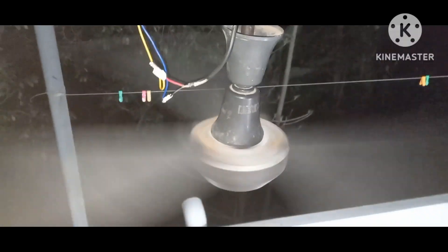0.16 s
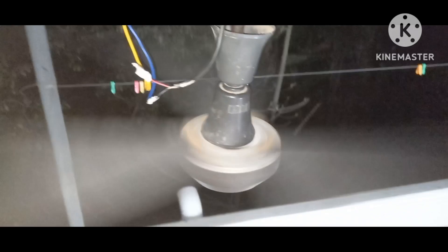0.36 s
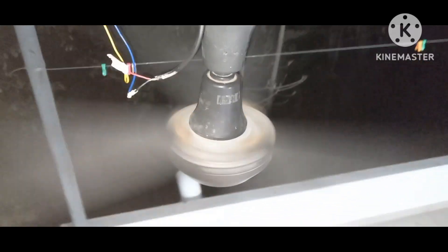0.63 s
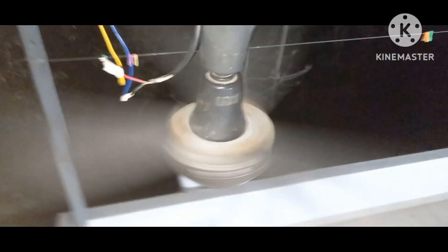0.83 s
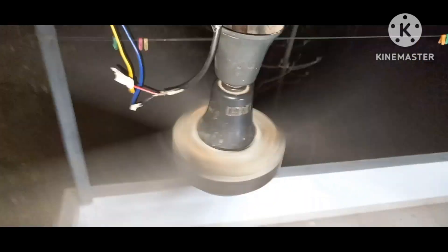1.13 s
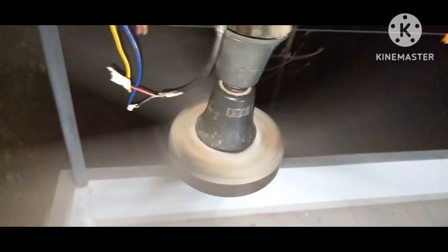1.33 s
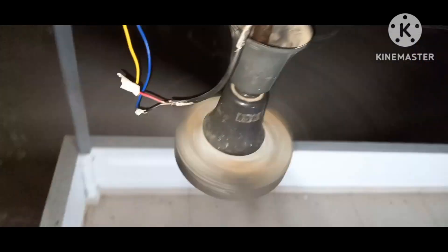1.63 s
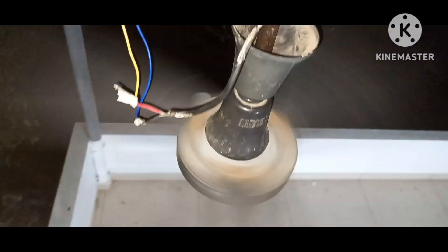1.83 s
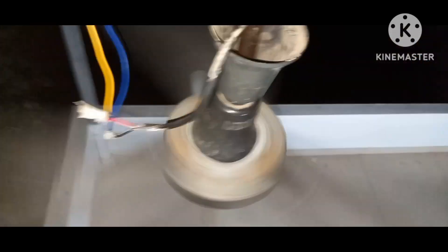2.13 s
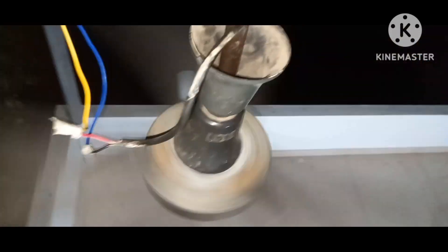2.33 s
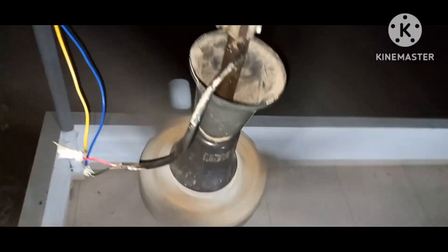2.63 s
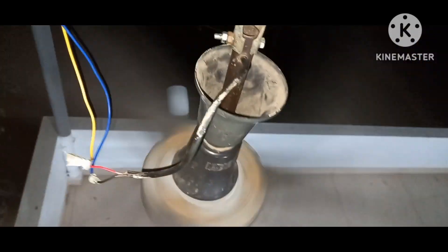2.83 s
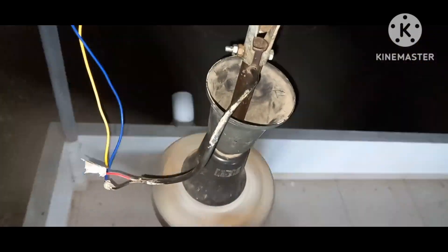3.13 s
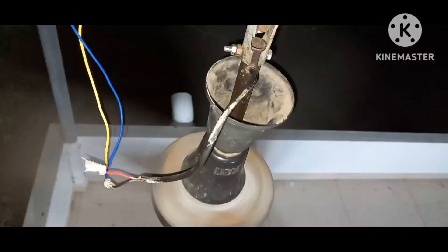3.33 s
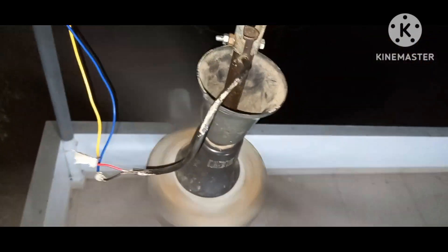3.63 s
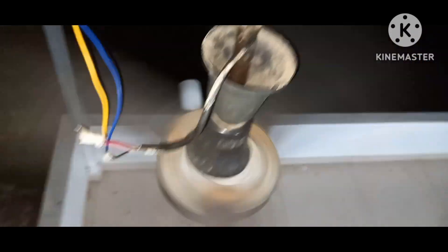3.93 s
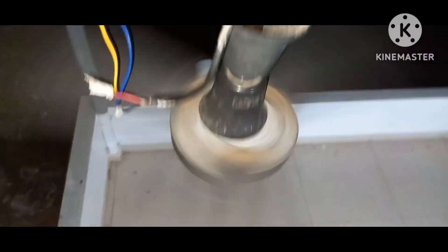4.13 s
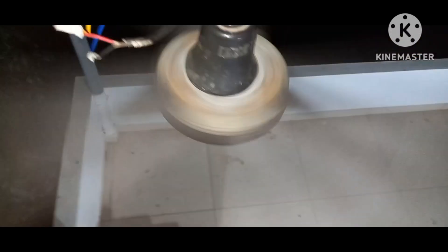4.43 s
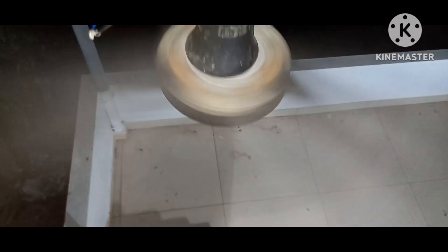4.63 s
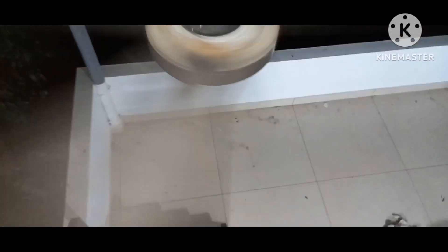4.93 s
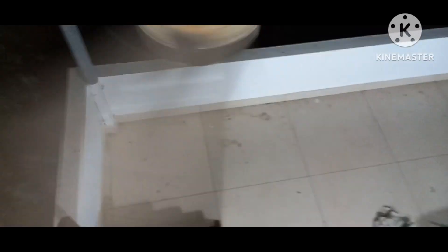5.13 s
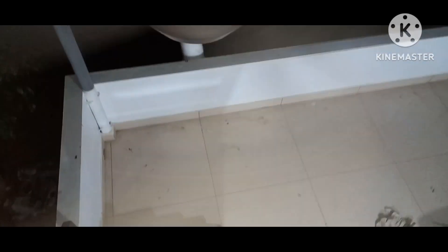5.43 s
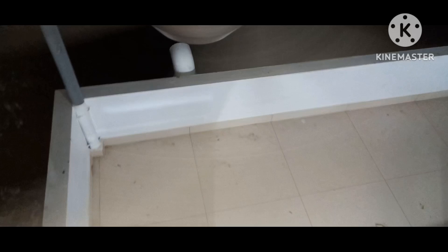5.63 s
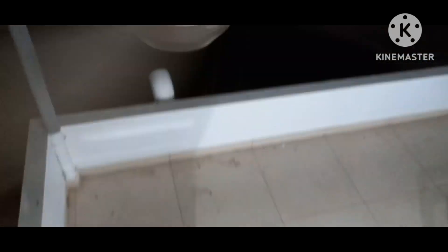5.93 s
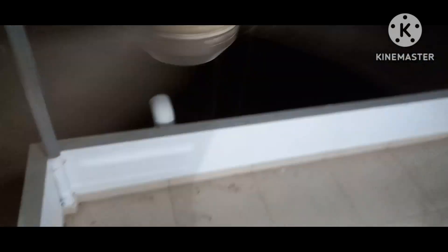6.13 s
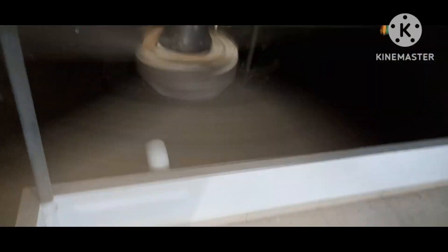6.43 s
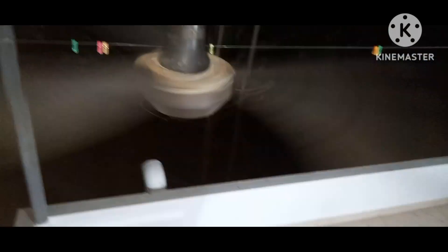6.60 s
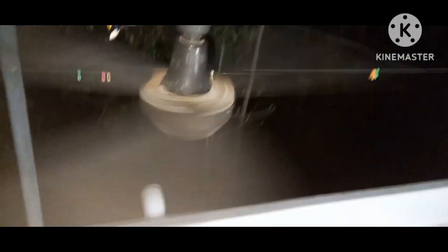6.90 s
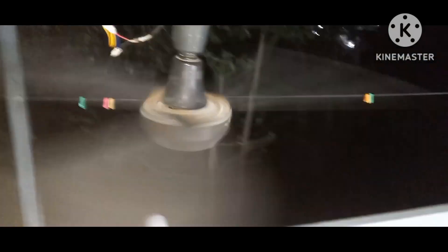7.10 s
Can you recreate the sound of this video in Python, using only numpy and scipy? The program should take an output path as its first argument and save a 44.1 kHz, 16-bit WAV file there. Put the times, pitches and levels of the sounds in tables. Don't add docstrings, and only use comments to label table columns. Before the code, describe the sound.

Close, breathy fan noise with rapid blade flutter fills an open roofed terrace at night. Uneven bassy gusts buffet the left and right of the microphone as it moves around the fan, with dull tip slaps scattered through. A slight hollow resonance and faint motor whine sit inside the rush. Behind it, high katydid scraping continues, with a few soft cricket pulses.

```python
import sys
import numpy as np
from scipy import signal
from scipy.fft import rfft, irfft, next_fast_len
from scipy.io import wavfile
from scipy.ndimage import uniform_filter1d, map_coordinates

SR = 44100
rng = np.random.default_rng(int(sys.argv[2]) if len(sys.argv) > 2 else 0)


def linear_from_db(decibels):
    return 10 ** (np.asarray(decibels, float) / 20)


def generate_wav(sig):
    pcm = np.round(np.clip(np.atleast_2d(sig).T, -1, 1) * 32767).astype(np.int16)
    wavfile.write(sys.argv[1], SR, pcm)


N = 320166
BLADE_HZ, BLADE_AT = 15.25, .37

# (time [s], depth [dB], lag [share of a pass])
BEAT = [(0, 2.5, 0.13), (.9, 2, 0.05), (1.5, 3, 0), (2.1, 3.5, 0.1), (2.7, -0.2, 0.05), (3.3, 2.5, 0.1),
        (3.9, 1, 0.13), (4.5, 3, 0), (5.1, 1.5, 0.04), (5.7, 3, -.12), (6.3, 3.5, 0), (7.26, 2, 0.1)]
# (time [s], recorder gain [dB], nearness [0-1], height over the blade plane [-1 to 1])
HAND = [(0.08, -5, 0.3, -0.34), (.47, -5.5, 0.22, -0.24), (.75, -5.5, 0.45, -0.26), (1.0, 1, 0.15, -0.079),
        (1.36, 2, 0.18, 0.27), (1.55, -1.5, 0.3, .5), (2.05, -1.5, 0.16, 0.58), (2.5, -1, 0.47, 0.12),
        (3.0, -1, 0.24, 0.87), (3.46, 1, 0.5, .8), (3.9, -1, 0.22, 0.8), (4.3, 1, 0.44, 0.26),
        (4.9, -0.5, 0.53, -0.05), (5.4, 1, 0.61, -0.48), (6.0, 4, 0.6, -0.3), (6.2, 2, 0.86, -0.72),
        (6.7, 1.5, 0.61, -0.65), (7.26, 1.5, 0.65, -1.1)]
# (frequency [Hz], left-right likeness [0-1])
ALIKE = [(60, 1), (250, 0.8), (500, 0.71), (900, 0.42), (1200, 0.095), (1500, 0.13), (3000, 0),
         (8000, 0.44)]


def unit(x):
    return x / np.sqrt(np.mean(x ** 2) + 1e-20)


def along(points, hz):
    f, v = np.transpose(points)
    return np.interp(np.log(hz + 1), np.log(f + 1), v)


def curves(rows):
    s, *cols = np.transpose(rows)
    return [np.interp(np.arange(N) / SR, s, c) for c in cols]


def wobble(rate):
    knots = rng.standard_normal(int(N * 80 / SR) + 4)
    return map_coordinates(knots, [np.arange(N) * min(rate, 79) / SR])


def filtered(x, response):
    m = next_fast_len(N + 8192)
    return irfft(rfft(x, m) * response(np.fft.rfftfreq(m, 1 / SR)), m)[..., :N]


def ring(f, hz, width):
    return 1j * f * width / (hz * hz - f * f + 1j * f * width)


def air(spectrum, alike, patchy_db):
    z = signal.stft(rng.standard_normal((2, N)), nperseg=512)[2]
    field = uniform_filter1d(rng.standard_normal(z.shape[1:]), size=4, axis=0)
    field = uniform_filter1d(field, size=4, axis=1)
    pair = signal.istft(z * linear_from_db(patchy_db * unit(field)), nperseg=512)[1][:, :N]

    def mid_side(hz):
        turn = np.arccos(np.clip(along(alike, hz), -1, 1)) / 2
        return linear_from_db(along(spectrum, hz)) * [np.cos(turn), np.sin(turn)]

    mid, side = filtered(pair, mid_side)
    return unit(np.array([mid + side, mid - side]))


def passes(lag, sharp):
    turns = BLADE_HZ * np.arange(N) / SR - BLADE_AT - lag
    peak = np.exp(sharp * np.cos(2 * np.pi * turns))
    return unit(peak - peak.mean())


def hand_level(level_db, near_db, height_db):
    _, near, height = curves(HAND)
    return level_db + near_db * near + height_db * height


def narrowed(pair):
    near = curves(HAND)[1]
    mid = pair.mean(axis=0)
    side = (pair[0] - pair[1]) / 2 * linear_from_db(3.5 - 10 * near)
    return np.array([mid + side, mid - side])


def katydids():
    # (stroke rate [1/s], wing resonance [Hz], level [dB], left-right [dB])
    singers = [
        (56.1, 6950, 8, -4.5),
        (53.9, 6650, -3.5, -2.5),
        (55.8, 7180, -5, 1.5),
        (75.3, 7080, 3.5, -3.5),
    ]
    # (frequency [Hz], spectrum level [dB per Hz])
    chorus = [(3290, -35), (5600, -8.5), (6100, -8.5), (6630, 5), (6950, 0.5), (7900, -8.5), (8330, -19.5),
              (8510, -36.5), (8600, -49.5), (11200, -84), (18900, -120)]
    near = np.zeros((2, N))
    for rate, hz, db, pan_db in singers:
        turns = np.cumsum(rate * (1 + .012 * wobble(3))) / SR
        stroke = np.exp(1.1 * np.cos(2 * np.pi * turns) + 1.6 * np.cos(2 * np.pi * turns / 3))
        scrape = filtered(stroke * rng.standard_normal((2, N)), lambda f: ring(f, hz, 800) ** 2)
        near += linear_from_db(db + 3 * wobble(1.2) + np.array([[pan_db], [-pan_db]]) / 2) * unit(scrape)
    far = linear_from_db(0.39 * wobble(15)) * air(chorus, [(6000, 0.035)], patchy_db=2.0)
    return linear_from_db(-45.5 + 3.5) * unit(linear_from_db(-5.5) * unit(near) + far)


def cricket():
    # (time [s], level [dB], frequency [Hz], half length [s])
    chirps = [(1.905, -47, 4770, 0.022), (2.092, -49, 4730, 0.045), (2.22, -50, 4700, 0.03),
              (2.325, -48.5, 4660, .025), (2.417, -52, 4500, 0.069), (3.38, -57, 4700, 0.086),
              (4.184, -51, 4980, 0.043), (4.295, -54, 5150, 0.047), (5.77, -53, 4740, 0.026),
              (6.132, -40, 4820, 0.03), (6.192, -51, 4930, 0.045), (6.341, -45, 4850, 0.043),
              (6.9, -51, 4700, 0.036), (7.075, -48, 4680, 0.037)]
    t, song = np.arange(N) / SR, np.zeros((2, N))
    for s, db, hz, half in chirps:
        at = slice(max(0, int((s - .3) * SR)), int((s + .3) * SR))
        since = t[at] - s
        shape = np.exp(-(since / half) ** 2 / 2 + 0.52 * np.cos(2 * np.pi * 36 * since) - .3)
        pair = rng.standard_normal((2, 2, N))[:, :, at]
        drift = uniform_filter1d(pair[0] + 1j * pair[1], size=65, axis=1)
        song[:, at] += linear_from_db(db + 24.5) * shape * (drift * np.exp(2j * np.pi * hz * t[at])).real
    return song


def canopy():
    # (frequency [Hz], width [Hz], level [dB])
    modes = [
        (1620, 105, 1),
        (2342, 170, -5),
        (1295, 50, -2.5),
    ]

    def cup(f):
        return sum(linear_from_db(db) * ring(f, hz, width) ** 2 for hz, width, db in modes)

    breath = linear_from_db(2.8 * wobble(16)) * air([(100, 0)], [(1600, 0.18)], patchy_db=2.5)
    return linear_from_db(hand_level(-46, 0, 8)) * unit(filtered(breath, cup))


def eddies():
    # (time [s], strength [dB], left-right [dB])
    draught = [(0.08, -26.5, 1), (.55, -30, 0), (.8, -22, -4), (1.1, -25.5, 6.5), (1.5, -23, -1),
               (1.7, -25, -12), (2.05, -24.5, -5), (2.3, -25.5, 0), (3.1, -29, -1), (3.5, -28.5, -6),
               (3.62, -19.5, -2), (4.15, -22.5, 0.5), (4.4, -37, -7), (4.7, -29, -0.5), (5.3, -30.5, -0.5),
               (5.65, -26.5, -1), (6.3, -29, 1.5), (7.2, -28.5, -0.5)]
    # (time [s], level over the stream [dB], left-right [dB])
    lumps = [(.14, -12, 0), (.32, 1, -3), (.57, -9, -6), (1.08, 2.5, 10.5), (1.18, 3.5, 10), (1.28, 2.5, 4),
             (1.4, -4, -11), (1.5, 10, 8), (1.6, -11, -14), (1.82, -10, -10), (1.92, 3, 1), (2.64, -5, 3),
             (2.82, 9.5, 4), (3.02, -10, 1), (3.21, -9, -10), (3.26, 6.5, 4), (3.34, -5, -3),
             (3.38, 6.5, 5), (3.54, -21, -11), (3.84, 3, -1), (3.96, 3, 4), (4.26, 11.5, 2), (4.56, 6, 6),
             (4.66, 9, 1), (4.82, 3, 1), (5.16, -10, 4), (5.24, 7.5, 1), (6.32, 5, -4), (6.46, 6, 1),
             (6.64, 3, 1)]
    # (frequency [Hz], level [dB per Hz])
    thump_spectrum = [(18, -56.5), (30, -26.5), (43, -29), (67, -7.5), (86, 4.5), (132, -1.5), (190, -10),
                      (250, -31), (420, -120)]
    # (frequency [Hz], likeness [0-1])
    ports = [(25, .25), (90, .72), (200, .7)]
    lump_s, deep_hz = 0.017, 85
    level_db, pan_db = curves(draught)
    for s, db, side_db in lumps:
        shape = np.exp(-((np.arange(N) / SR - s) / lump_s) ** 2 / 2)
        level_db, pan_db = level_db + db * shape, pan_db + side_db * shape

    flow = narrowed(air(thump_spectrum, ports, patchy_db=1.4))
    deep = filtered(flow, lambda f: 1 / (1 + (f / deep_hz) ** 4))
    deep_db = 6 * curves(HAND)[2]
    flow = unit(linear_from_db(deep_db) * deep + linear_from_db(-deep_db / 2) * (flow - deep))

    power = uniform_filter1d((flow ** 2).mean(axis=0), size=2600)
    flow = flow / (np.abs(power) + 0.13) ** 0.24

    depth_db, lag = curves(BEAT)
    flutter_db = 0.67 * wobble(15) + 0.9 * np.array([wobble(12), wobble(13)])
    thump = linear_from_db(0.73 * depth_db * passes(lag + 0.077, sharp=0.54) + flutter_db) * flow
    return linear_from_db(level_db + 1.6 + np.array([pan_db, -pan_db]) / 2) * unit(thump)


def slaps():
    # (time [s], peak level [dB], pitch [Hz])
    cuts = [(0.739, -6, 556), (1.721, -4, 266), (2.252, -13, 269), (2.322, -7, 356), (2.611, -4, 287),
            (3.316, -11, 433), (3.506, -4.5, 436), (3.582, -4, 355), (3.775, -10, 370), (4.27, -20, 280),
            (4.349, -10, 262), (4.482, -9.5, 272), (4.549, -11, 270), (4.613, -16, 250), (4.806, -11, 260),
            (5.074, -7, 288), (5.511, -8, 243), (5.633, -8, 644), (5.697, -5.5, 660), (5.789, -27, 510),
            (5.911, -6.5, 433), (5.978, -13, 315), (6.306, -8, 295), (6.362, -9, 480), (6.429, -10, 527),
            (6.512, -8.5, 494), (6.58, -13, 425), (6.695, -11, 496), (6.765, -8, 576), (7.035, -5.5, 310)]
    t, out = np.arange(900) / SR, np.zeros((2, N + 900))
    spike_t = t - .004
    spike = (1 - spike_t ** 2 / 0.00038 ** 2) * np.exp(-spike_t ** 2 / 0.00019 ** 2 / 2)
    for (s, db, hz), (phase, pan) in zip(cuts, rng.standard_normal((60, 2))):
        decay = linear_from_db(db - 3.5 - 60 * t / 0.031)
        pulse = decay * (1 - np.exp(-t / 0.0016)) * np.sin(2 * np.pi * hz * t + phase)
        pulse += linear_from_db(db - 8.5) * spike * np.sign(phase)
        out[:, round(s * SR):][:, :900] += linear_from_db([[1.2 * pan], [-1.5 * pan]]) * pulse
    return out[:, :N]


def motor_whine():
    # (frequency [Hz], level [dB])
    tones = [
        (1136, -51.5),
        (2280, -55.5),
    ]
    t = np.arange(N) / SR
    return sum(linear_from_db(db + 1.5 * wobble(6)) * np.sin(2 * np.pi * hz * t + 1.2 * wobble(20)) for hz, db in tones)


def edge_hiss(gust):
    # (frequency [Hz], level [dB per Hz])
    hiss_spectrum = [(1070, -26), (1820, 0.5), (2320, 0), (4270, -8), (4890, -9.5), (5430, -16),
                     (6000, -17.5), (7800, -39.5), (13200, -120)]
    # (lag [share of a pass], swell [dB], swell per height [dB])
    edges = [
        (-.12, 0.65, -0.5),
        (.36, 1, 0.5),
    ]
    height = curves(HAND)[2]
    edges_db = sum((db + more_db * height) * passes(lag, sharp=3.2) for lag, db, more_db in edges)
    hiss = air(hiss_spectrum, [(2000, 0.13), (6000, 0.13)], patchy_db=2.5)
    hiss = linear_from_db(edges_db + 0.36 * gust + 0.17 * wobble(13)) * hiss
    hiss[0] = np.roll(hiss[0], shift=15)
    return linear_from_db(hand_level(*(-42.5, 4.1, 1.7)) + 3.5) * unit(hiss)


def swish(gust):
    # (frequency [Hz], level [dB per Hz])
    swish_spectrum = [(590, -24), (1000, 1.5), (1320, 3), (1440, -2.5), (1630, -1.5), (1820, -21.5),
                      (2370, -46.5), (4000, -120)]
    lead = 0.11
    depth_db, wake_lag = curves(BEAT)
    beat = depth_db * passes(wake_lag - lead, sharp=2.6)
    noise = air(swish_spectrum, ALIKE, patchy_db=3.0)
    noise = linear_from_db(0.64 * beat + 0.4 * gust + 1.1 * wobble(25)) * noise
    return linear_from_db(hand_level(*(-36, 1.9, -.6)) + 1.15) * unit(noise)


def roar(gust):
    # (frequency [Hz], level [dB per Hz])
    roar_spectrum = [(260, -32.5), (450, -1), (543, 0), (841, -5.5), (1000, -8), (1300, -28), (2200, -120)]
    # (time [s], brightening [dB])
    tilt = [(0, -0.5), (.9, 5), (1.2, 9.5), (1.9, 13.5), (2.3, 1), (2.8, -4.5), (3.3, -15.5), (4, -13.5),
            (4.35, 8.5), (4.9, 11.5), (5.3, -3), (5.8, 1.5), (6.3, -2.5), (7.26, -3.5)]
    depth_db, wake_lag = curves(BEAT)
    beat = depth_db * passes(wake_lag, sharp=3.0)
    noise = air(roar_spectrum, ALIKE, patchy_db=0.5)
    noise = linear_from_db(0.51 * beat + 0.7 * gust + 1.7 * wobble(45)) * noise
    upper = filtered(noise, lambda f: 1 / (1 + (680 / (f + 1)) ** 8))
    tilt_db = curves(tilt)[0]
    noise = linear_from_db(tilt_db / 2) * upper + linear_from_db(-tilt_db / 2) * (noise - upper)
    return linear_from_db(hand_level(*(-32, 7.16, -2.5)) - 0.48) * unit(noise)


def wake(gust):
    # (frequency [Hz], level [dB per Hz])
    wake_spectrum = [(100, -21), (170, -2.5), (275, 3.5), (382, -2), (420, -6), (450, -4), (580, -34),
                     (990, -120)]
    depth_db, wake_lag = curves(BEAT)
    beat = depth_db * passes(wake_lag, sharp=3.0)
    noise = air(wake_spectrum, ALIKE, patchy_db=-1.5)
    noise = linear_from_db(0.69 * beat + 0.47 * gust + 1.43 * wobble(40)) * noise
    return linear_from_db(hand_level(*(-30, 5.1, 5.1)) - 1.2) * unit(noise)


def fan():
    gust = 0.25 * wobble(12) + 0.8 * wobble(35)
    low = narrowed(wake(gust) + roar(gust))
    return low + swish(gust) + edge_hiss(gust) + motor_whine()


def scene():
    return katydids() + cricket() + canopy() + eddies() + slaps() + fan()


def sparse_top(x):
    # (frequency [Hz], level relative to the insect band [dB])
    weakest = [(7800, -60), (8050, -30), (8400, -24), (9300, -21), (11000, -26), (15000, -27.5)]
    hz, _, z = signal.stft(x, SR, window="cosine", nperseg=2048)
    power = uniform_filter1d(np.abs(z) ** 2, size=3, axis=1)
    insects = power[:, (hz > 6400) & (hz < 7200)].mean(axis=(0, 1))
    insects = uniform_filter1d(insects, size=9)

    top = hz > 12000
    drift = uniform_filter1d(rng.standard_normal((2, len(insects))), size=2)
    mood_db = 3.5 * drift[top * 1] * np.where(top, .35, 1.3)[:, None]
    kept = power.mean(axis=0) > insects * linear_from_db(2 * (along(weakest, hz)[:, None] + mood_db))
    return signal.istft(z * kept, SR, window="cosine", nperseg=2048)[1][:, :N]


def low_pass(x):
    return signal.sosfilt(signal.butter(12, 15750, fs=SR, output="sos"), x)


def record(dry):
    # (time [s], level [dB])
    opening = [
        (0, -59),
        (.022, -48),
        (.036, -17),
        (.06, -3.5),
        (.085, 1),
    ]
    n = np.arange(N)
    gain_db = curves(opening)[0] + curves(HAND)[0]
    x = filtered(dry * linear_from_db(gain_db), lambda f: 1 / (1 + (f / 8250) ** 90))

    def band(hz, half_hz):
        return filtered(x, lambda f: 1 / (1 + ((f - hz) / half_hz) ** 6))

    low_image = band(6700, 290) * np.cos(2 * np.pi * 16000 * n / SR)
    low_image = filtered(low_image, lambda f: f < 12000)
    high_image = band(7050, 480) * (-1.) ** n
    mix = x + linear_from_db(-15 + 0.44 * wobble(18)) * low_image + linear_from_db(-26.5) * high_image
    mix = sparse_top(mix)
    return low_pass(mix)


dry = scene()
out = record(dry)
generate_wav(out)
```